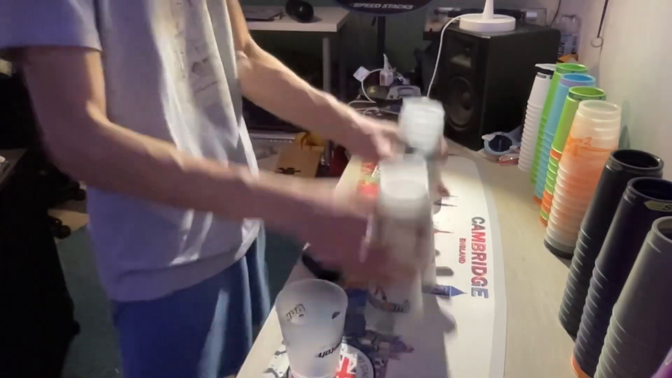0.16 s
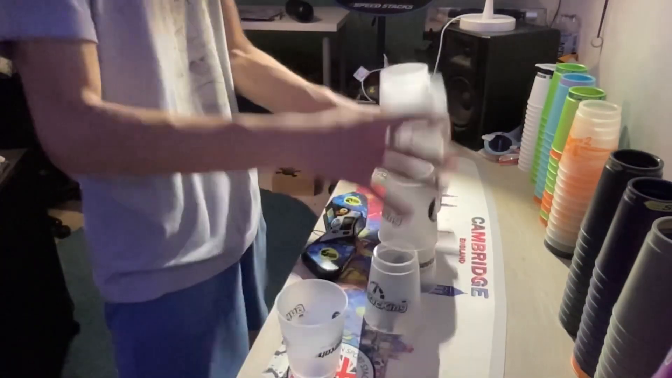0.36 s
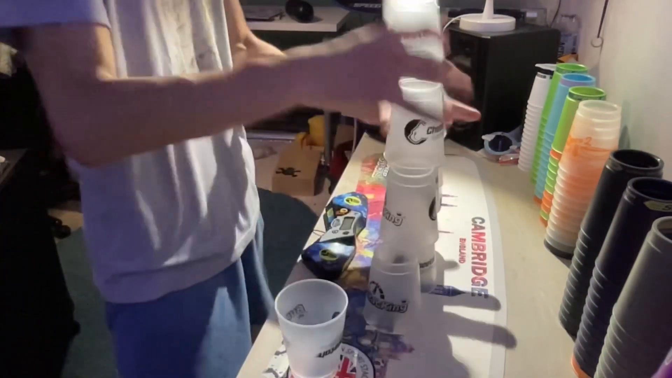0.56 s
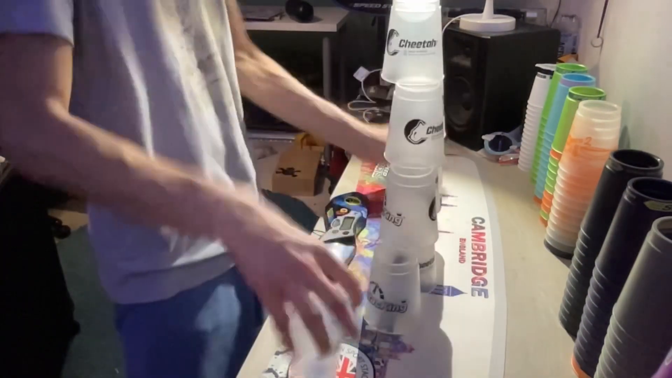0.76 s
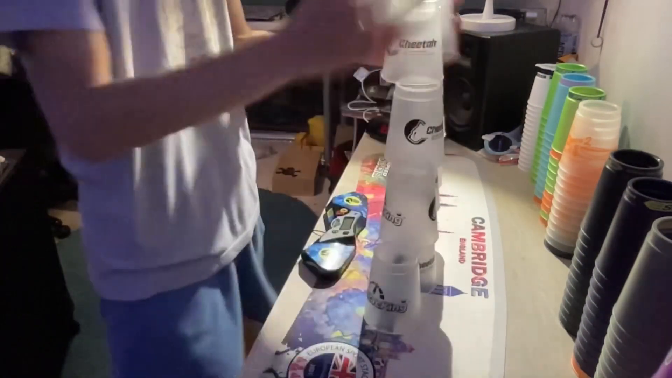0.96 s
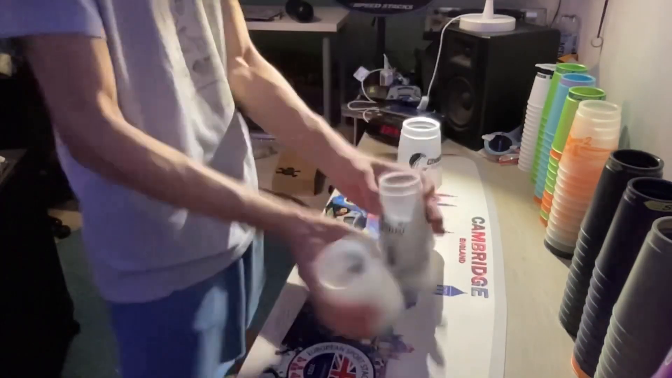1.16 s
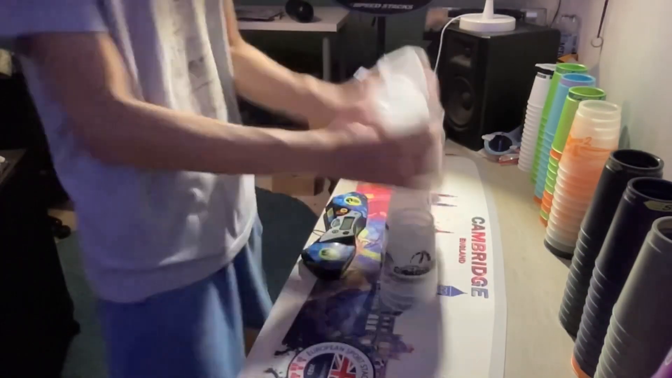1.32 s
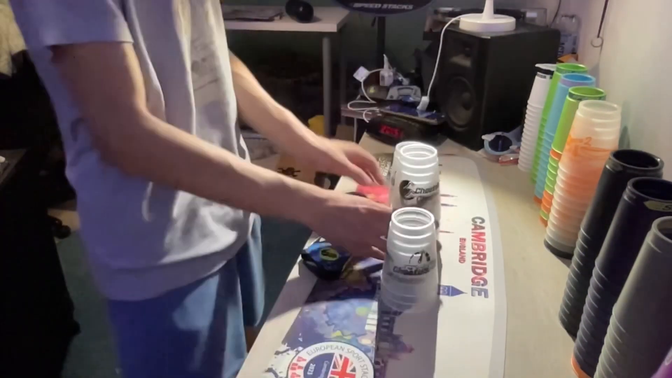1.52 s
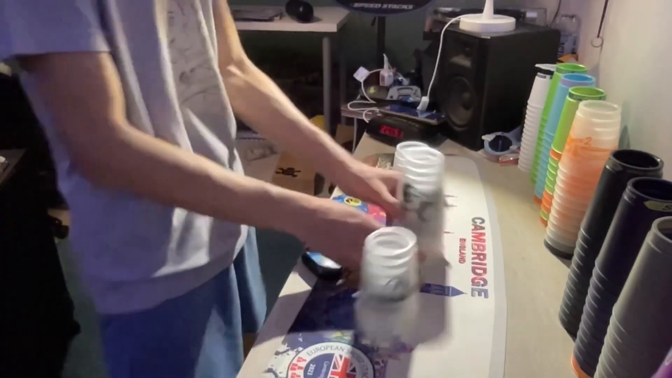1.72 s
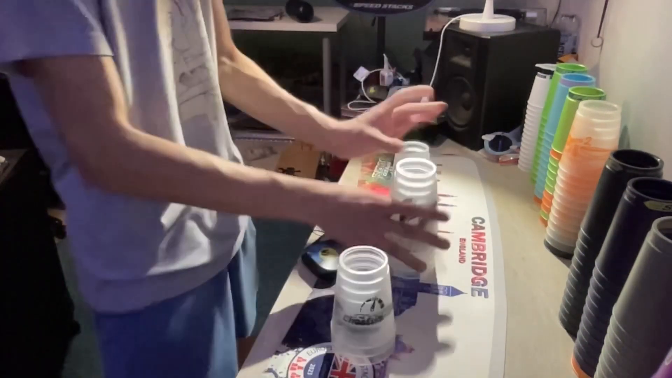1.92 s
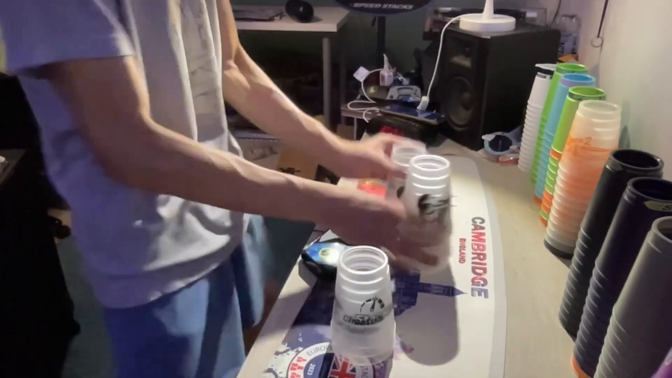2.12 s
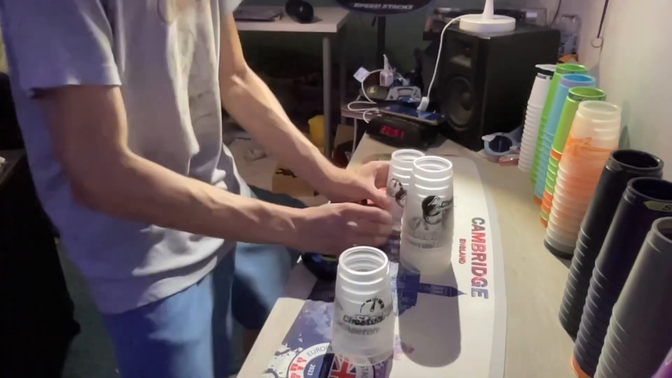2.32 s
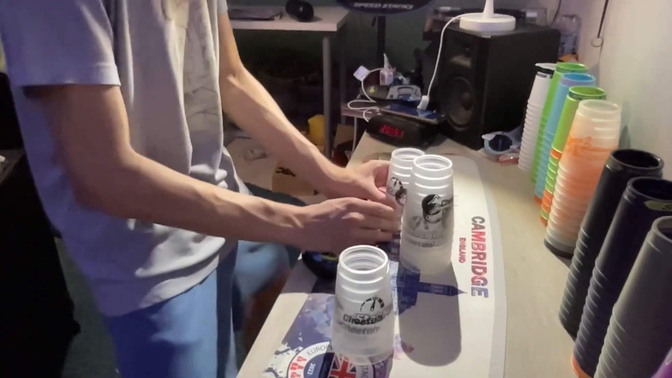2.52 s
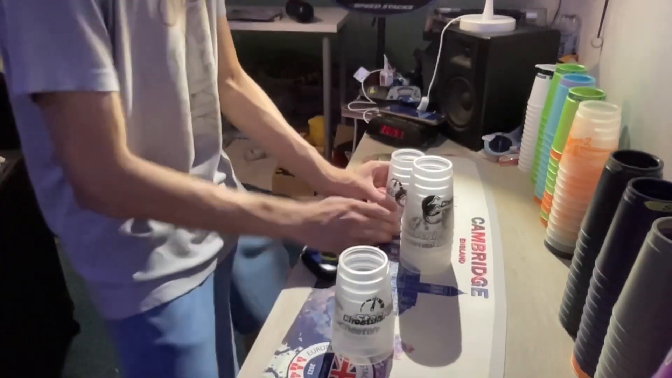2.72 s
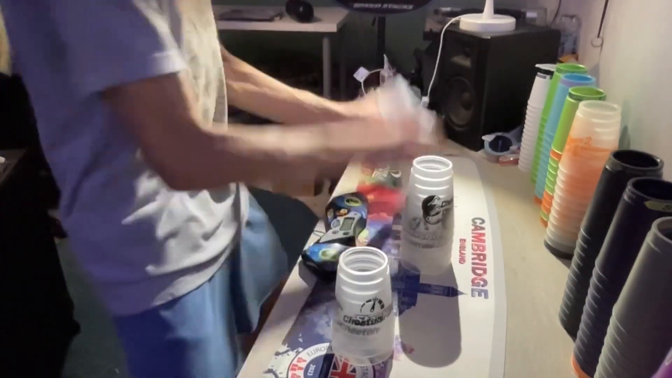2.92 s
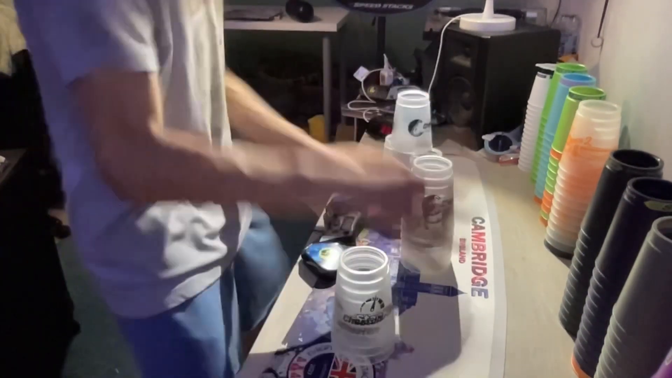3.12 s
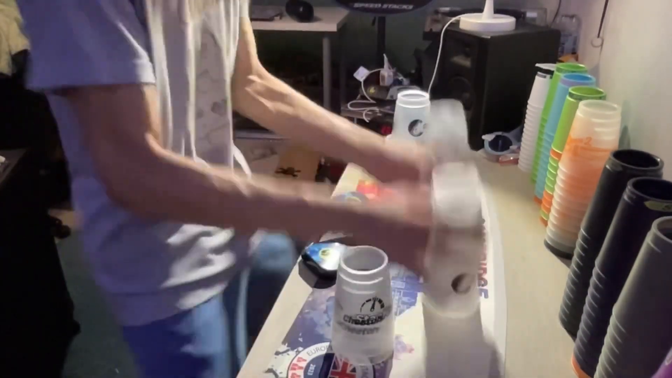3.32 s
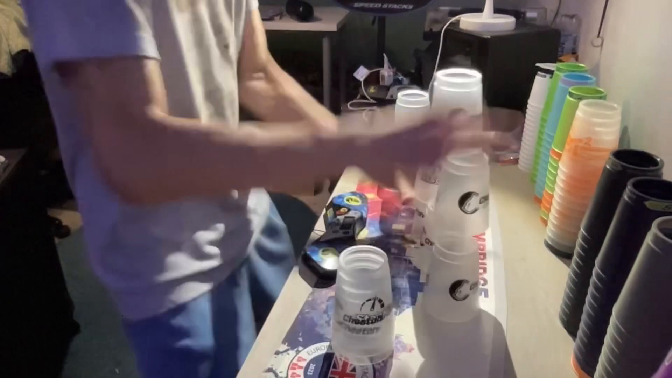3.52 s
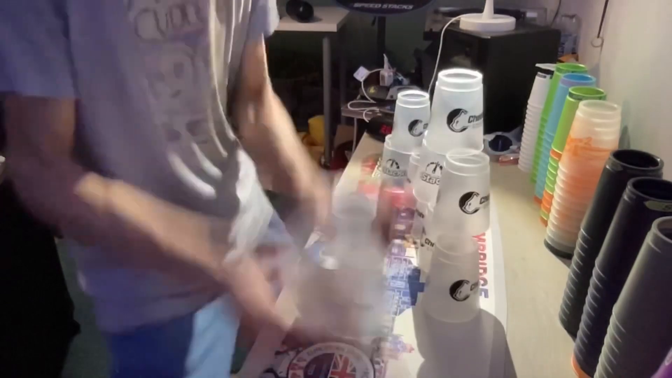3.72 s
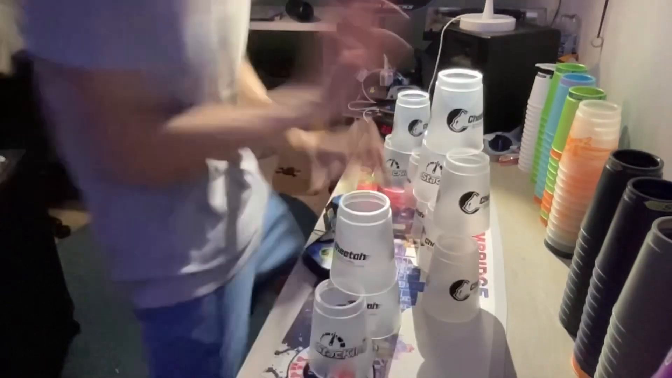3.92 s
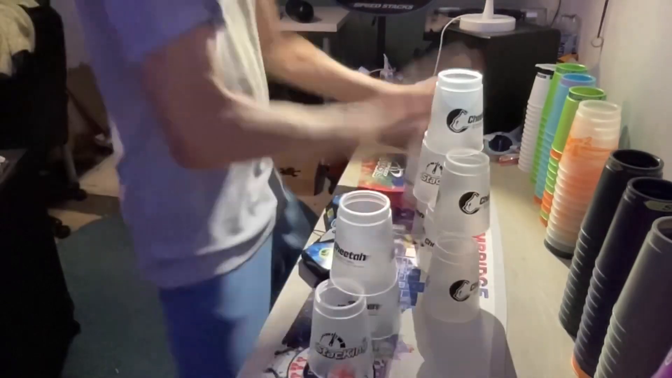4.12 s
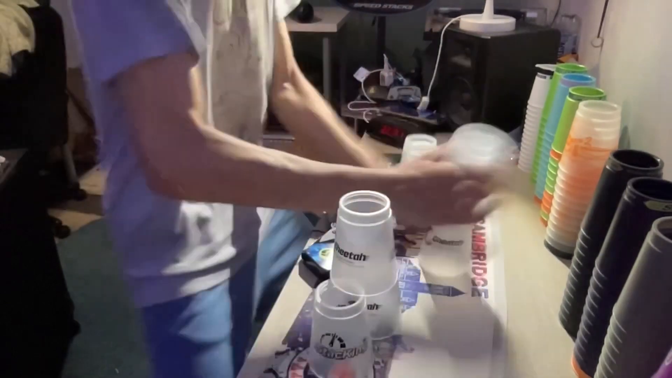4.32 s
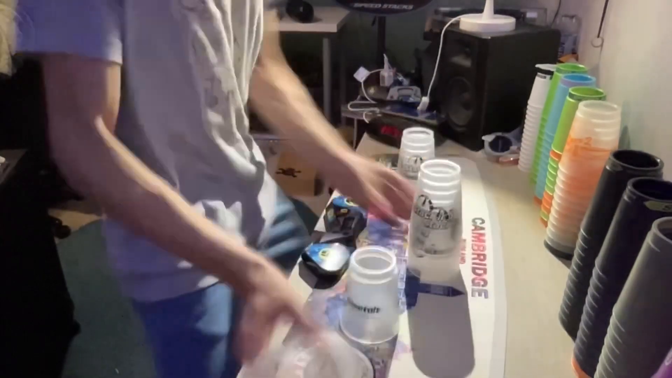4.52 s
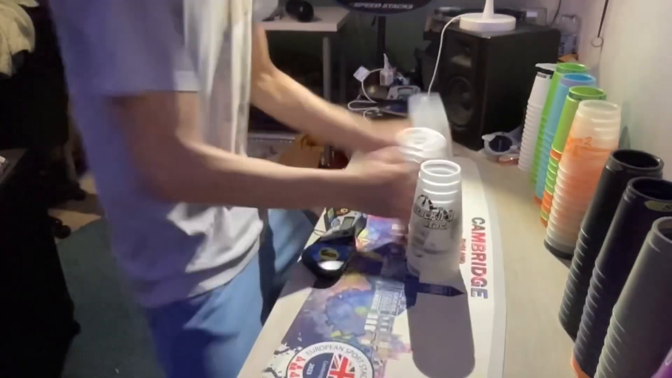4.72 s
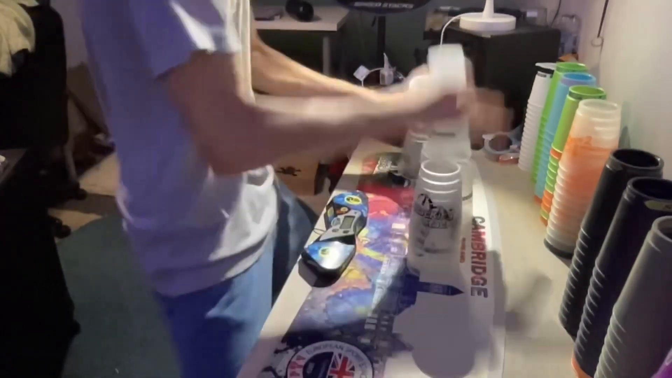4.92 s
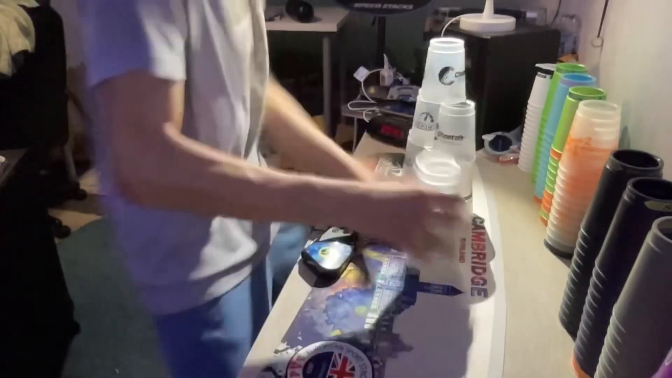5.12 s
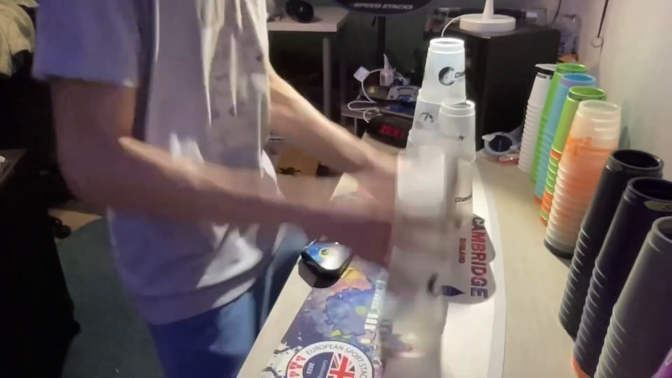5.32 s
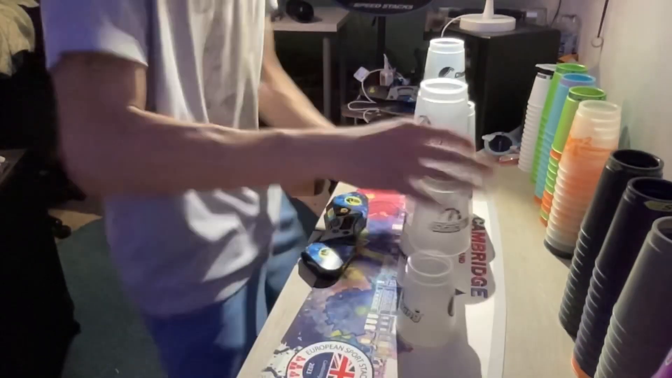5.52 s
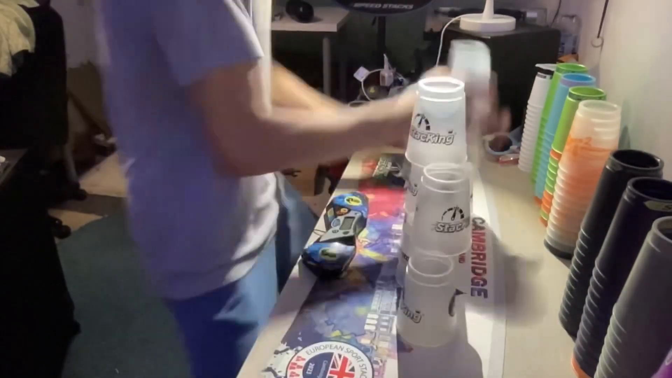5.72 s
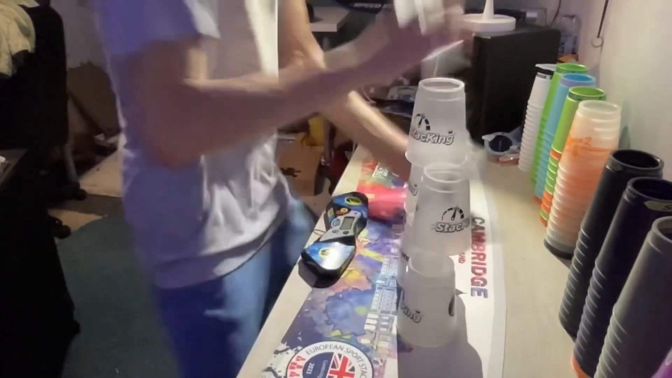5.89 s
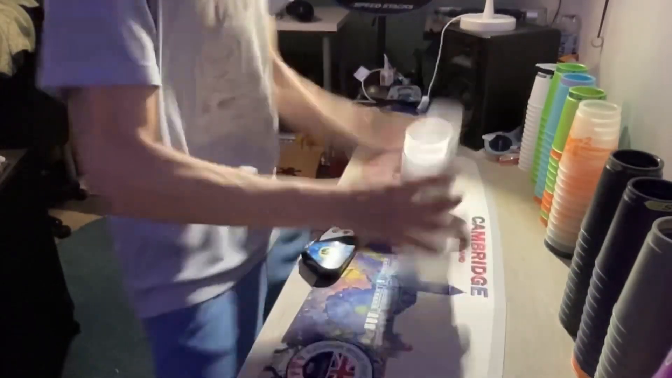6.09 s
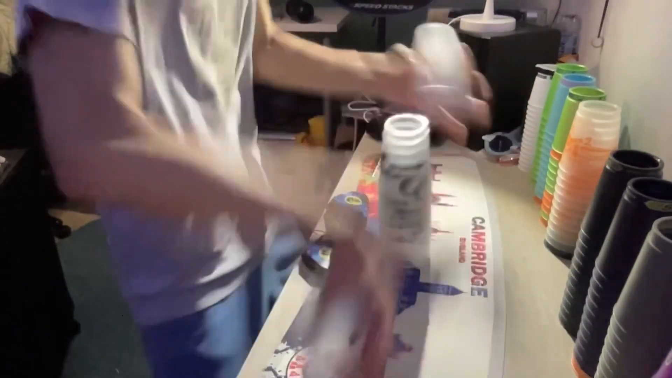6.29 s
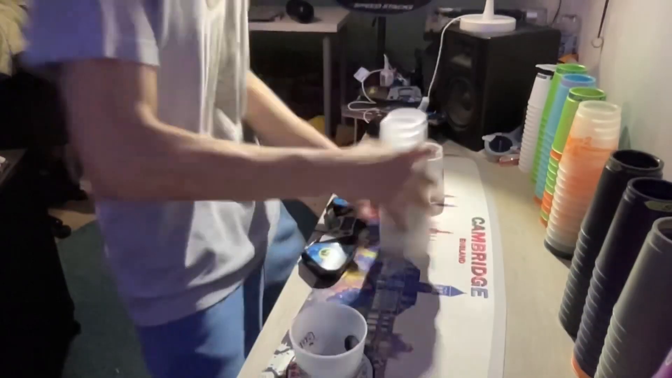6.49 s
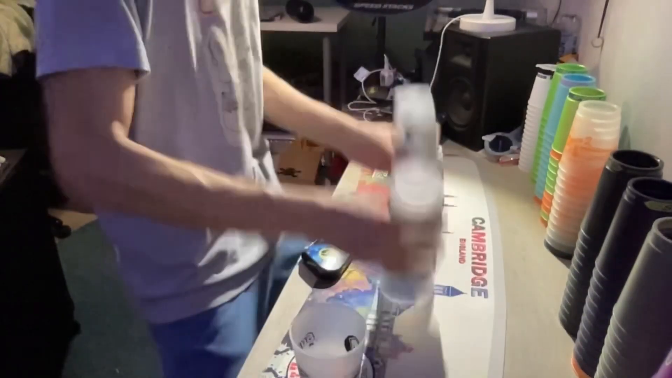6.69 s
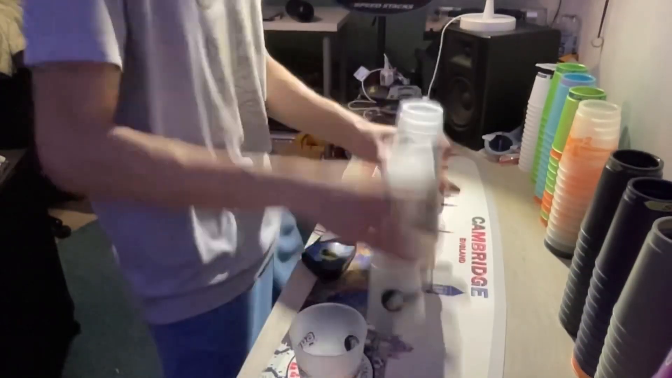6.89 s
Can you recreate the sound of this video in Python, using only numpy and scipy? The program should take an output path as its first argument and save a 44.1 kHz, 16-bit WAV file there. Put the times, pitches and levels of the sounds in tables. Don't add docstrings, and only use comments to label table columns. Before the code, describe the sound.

Rapid plastic cup stacking in a small damped room: hollow pops, rattling rim scrapes and overloading slams, a quiet gap, then another faster clatter.

```python
import sys
import numpy as np
from scipy import signal
from scipy.fft import rfft, irfft, next_fast_len
from scipy.io import wavfile
from scipy.ndimage import uniform_filter1d, map_coordinates

SR = 44100
rng = np.random.default_rng(int(sys.argv[2]) if len(sys.argv) > 2 else 0)


def ratio_of_db(decibels):
    return 10 ** (np.asarray(decibels, float) / 20)


def generate_wav(signal):
    frames = np.transpose(np.atleast_2d(signal))
    scaled = np.clip(frames, -1, 1) * 32767
    pcm = np.round(scaled).astype(np.int16)
    wavfile.write(sys.argv[1], SR, pcm)


N = 306495

# f/Hz, density/dB per Hz
RIM = [(1180, -4), (2000, -1.5), (2730, -6), (3180, -4.5), (6290, -5), (6800, -6.5), (7730, -7),
       (13400, -15.5), (15700, -20)]


def unit(x):
    return x / np.sqrt(np.mean(x ** 2) + 1e-20)


def along(points, hz):
    f, v = np.transpose(points)
    return np.interp(np.log(hz + 1), np.log(f + 1), v)


def filtered(x, response):
    m = next_fast_len(x.shape[-1] + 4096)
    spectrum = rfft(x, m) * response(np.fft.rfftfreq(m, 1 / SR))
    return irfft(spectrum, m)[..., :x.shape[-1]]


def shaped(x, points):
    return filtered(x, lambda f: ratio_of_db(along(points, f)))


def ring(modes, t, luck, rise):
    scatter_db, detune = 2.2, .02
    total = 0
    for (hz, db, t60), a, b in zip(modes, luck[::2], luck[1::2]):
        decay = ratio_of_db(db + scatter_db * a - 60 * t / t60)
        total = total + decay * np.sin(2 * np.pi * hz * (1 + detune * b) * t)
    return total * (1 - np.exp(-t / rise))


def tail(noise):
    # f/Hz, t60/s
    room_t60 = [(100, 0.35), (400, 0.14), (1100, 0.17), (3000, 0.17), (8000, 0.15), (15000, 0.18)]
    late_db, late_slower = -20.5, 2.12
    hz, t, z = signal.stft(noise, SR, nperseg=256)
    fall_db = -60 * t / along(room_t60, hz)[:, None]
    fall = ratio_of_db(fall_db) + ratio_of_db(late_db + fall_db / late_slower)
    x = signal.istft(z * fall, SR, nperseg=256)[1][:len(noise)]
    x = x * np.clip(np.arange(len(x)) / SR / 0.002 - .5, 0, 1)
    return x / np.linalg.norm(x)


def contacts(wet_db):
    # t/s, peak level/dB, cup air f/Hz, rim crack re peak/dB
    set_down = [(0.047, -6.5, 590, -24.5), (0.15, -7.5, 690, -22), (0.397, -18.5, 590, -21),
                (0.5, -10.5, 594, -20), (1.036, -36.5, 347, -13.5), (1.207, -22, 301, -5),
                (1.427, 6, 602, -15.5), (2.133, -17, 500, -15.5), (3.49, -5.5, 700, -24.5),
                (3.704, -24.5, 556, -7), (4.276, 3, 520.5, -4.5), (4.285, -7, 327, -10.5),
                (4.3, 3, 306, -9.5), (4.647, -10.5, 755, -11), (5.205, -18.5, 670, -11.5),
                (5.334, -16, 410, -24), (5.828, 3, 513, -9.5), (6.012, 1, 735, -5),
                (6.167, 2.5, 576, -19.5), (6.358, 2.5, 516, -24), (6.738, -5, 722, -21)]
    gripped = [(0.192, -25, 345, -30), (0.284, -27, 584, -15.5), (0.315, -17, 590, -22),
               (1.224, -10.5, 580, -13), (3.25, -18.5, 634, -15), (3.317, -21.5, 334, -50),
               (3.422, -8, 580, -20.5), (4.076, -7.5, 354, -25.5), (4.335, 0.5, 594, -27.5),
               (4.404, -4, 670, -17.5), (4.027, -6, 617, -26), (4.516, -0.5, 452, -15),
               (4.567, 0, 1000, -1.5), (4.813, -10, 535, -26), (4.885, -25.5, 350, -14),
               (5.174, -12, 474, -28.5), (5.365, -26, 353, -7.5), (5.929, -9, 634, -17.5),
               (5.97, -19, 584, -1), (6.085, 0.5, 560, -12), (6.142, -2.5, 640, -21)]
    nested = [(0.336, -6, 634, -25), (0.349, -17, 600, -21), (0.468, -11, 510, -24.5),
              (0.603, -7.5, 594, -19), (1.135, -12, 615, -7), (1.376, -27.5, 564, -12.5),
              (1.395, -10, 560, -9.5), (3.05, -12, 509, -16.5), (3.062, -1.5, 690, -17.5),
              (3.367, -3.5, 440, -25.5), (4.146, -7, 530, -9.5), (4.196, -10, 540, -9.5),
              (4.418, 4.5, 390, -14.5), (4.56, -14, 398, 3.5), (4.668, 1, 540, -20.5),
              (4.903, -7, 394, -20.5), (4.999, -11, 594, -16.5), (5.025, -7.5, 626, -17.5),
              (5.04, -2.5, 647, -21.5), (5.735, -13, 590, -17.5), (5.91, 4.5, 642, -17.5),
              (6.078, 4, 457, -12), (6.562, -9, 554, -20.5), (6.887, -4, 412, -23.5),
              (6.941, -5.5, 620.5, -24)]
    held = [(1.854, -46.5, 645, -30), (0.215, -5, 610, -23.5), (0.26, -49, 554, -35),
            (0.438, -0.5, 623, -24), (0.626, -10.5, 532, -17.5), (3.055, 3, 676, -21),
            (3.524, -4.5, 692, -23), (3.562, 1, 640, -20), (3.837, 0.5, 782, -15), (4.115, -23, 480, -8),
            (4.238, -5, 331, -21), (4.96, -13, 660, -22), (5.409, -7, 354, -26), (5.473, -8, 803, -20),
            (6.795, -3.5, 585, -22.5)]
    knocked = [(0.612, -8.5, 468, -12.5), (1.056, -17.5, 534, -16), (1.105, -20, 550, -9),
               (1.158, -17.5, 514, -3), (1.167, -11, 610, -11.5), (1.175, -10.5, 755, -8),
               (3.548, -19, 553, -3.5), (3.809, 2.5, 378, -25), (3.821, -6.5, 308, -22.5),
               (4.383, -7, 496, -2.5), (4.551, -16, 503, 4), (5.547, -6, 697, -14), (5.811, -7.5, 527, -1),
               (6.025, 5, 316.5, -16), (6.402, 5.5, 640, -27)]
    slammed = [(1.189, -0.5, 316, -11), (1.434, 0.5, 345, -13.5), (1.442, -10.5, 706, -10.5),
               (1.75, -39, 300, -33), (2.234, -35, 409, -11), (2.243, -6.5, 560, -6),
               (2.895, -26, 314, -20), (3.205, -18, 440, -17), (3.573, -16, 756, -11),
               (3.686, -30, 360, -8.5), (4.258, -5, 390, 1), (4.691, -10, 610, -6.5),
               (5.439, -26, 464, -5.5), (5.508, -13, 580, -10), (5.557, -17.5, 680, -16),
               (5.772, -34, 470, 5), (5.99, -7, 456, 0), (6.044, -8, 724, -12), (6.209, -39, 616, -21),
               (6.516, -24.5, 563, -12.5)]
    thuds = [(0.8, -27, 597, -21.5), (0.815, -26.5, 590, -18), (1.196, -7.5, 415, -3.5),
             (1.995, -32, 580, -22), (3.012, -34.5, 497, -22), (3.182, -24.5, 324, -18),
             (3.671, -27, 301, -27), (3.792, -19.5, 445, -30), (4.494, -12.5, 400, -21.5),
             (4.803, -34, 544, -3.5), (5.164, -31, 333, -20.5), (6.027, 0, 330, -11),
             (6.11, -1.5, 324, -21), (6.276, -7, 313, -6.5)]
    # contacts, table thump re peak/dB, wall ring re peak/dB
    kinds = [(set_down, -8.5, -3.5), (gripped, -6, -12), (nested, -20.5, -4), (held, -18.5, -8),
             (knocked, -17, 6.6), (slammed, 0.047, 2.4), (thuds, 0.78, -19.5)]
    # f/Hz, level/dB, t60/s
    wall_modes = [(1112, 2, 0.0084), (1279, -5, 0.011), (1434, -5.5, 0.012), (1620, -2, 0.0088),
                  (1860, -10, 0.014), (2083, -8.5, 0.0015), (2858, -5, 0.0069)]
    # f/Hz, level/dB, t60/s
    table_modes = [(144.6, -8.5, 0.13), (221.8, -14, 0.095), (256.2, -5, 0.079), (339, 2.5, 0.031)]
    # f/Hz, level/dB, t60/s
    frame_modes = [(60.4, -29.5, 0.63)]

    size = SR // 2
    hits = sorted((s, db, hz, thump_db, wall_db, rim_db)
                  for rows, thump_db, wall_db in kinds for s, db, hz, rim_db in rows)
    out, t = np.zeros(N + 2 * size), np.arange(size) / SR
    luck = rng.standard_normal((len(hits), 36))
    cracks = unit(shaped(rng.standard_normal((len(hits), size)), RIM))
    tails = rng.standard_normal((len(hits), size))
    for (s, db, hz, thump_db, wall_db, rim_db), u, crack, noise in zip(hits, luck, cracks, tails):
        air_modes = [(hz, 0, .014), (.95 * hz, -17, .07), (1.417 * hz, -7, .012)]
        air = ring(air_modes, t, 0.88 * u, rise=0.00078)
        push = ring([(0.81 * hz, -0.5, .004)], t, u[6:], rise=0.0012)
        pop = ratio_of_db(-2.0) * air + ratio_of_db(7.0) * push
        pop = signal.lfilter([1, -1], [1, -.97], pop)

        wall = ratio_of_db(wall_db - 3) * ring(wall_modes, t, u[6:], rise=0.0016)

        soft = np.clip(.35 - 0.0053 * (db + rim_db + 8.5), .02, .8)
        crack = signal.lfilter([1 - soft], [1, -soft], crack)
        rocking = np.sin(2 * np.pi * 110 * ratio_of_db(2 * u[34]) * t + u[35])
        chatter = ratio_of_db(-60 * t / .06) * (1 + .7 * rocking)
        envelope = (ratio_of_db(-60 * t / 0.0058) + 0.38 * chatter) * (1 - np.exp(-t / 0.00098))
        rim = ratio_of_db(rim_db + 4) * crack * envelope

        thump = ratio_of_db(thump_db + 4) * ring(table_modes, t, u[20:], rise=0.0055)
        frame_db = thump_db + .5 * min(db + thump_db + 10, 0)
        thump += ratio_of_db(frame_db) * ring(frame_modes, t, u[30:], rise=.015)

        cup = pop + wall + rim
        answer = signal.fftconvolve(cup[:size // 4] + 0.21 * thump[:size // 4], tail(noise))[:size]
        out[round(s * SR):][:size] += ratio_of_db(db) * (cup + thump + ratio_of_db(wet_db) * answer)
    return out[:N]


def clacks(wet_db):
    # t/s, peak level/dB, f/Hz, t60/s
    side_blows = [(0.151, -30, 1580, .04), (0.218, -24, 1850, .04), (0.4363, -23, 1950, 0.049),
                  (0.439, -20, 990, .06), (0.6117, -5, 1438, .06), (.613, -12.5, 1123, 0.051),
                  (.222, -25.5, 1080, .08), (.05, -25, 1180, 0.047), (1.0536, -21.5, 1290, 0.069),
                  (1.108, -11, 3220, 0.025), (1.1183, -11.5, 1346, 0.033), (1.1667, -10, 1973, .03),
                  (1.188, -0.5, 1570, 0.013), (1.427, -2, 2080, 0.016), (1.748, -37, 1350, .012),
                  (1.855, -52, 1300, .012), (2.243, -12.5, 2000, .03), (2.81, -45, 1700, .15),
                  (4.259, -3.5, 1500, 0.014), (5.031, -13, 2810, 0.013), (2.008, -48, 1500, 0.022),
                  (3.5657, -9.5, 1320, 0.058), (3.7, -28, 1550, .04), (3.809, -2.5, 998, 0.049),
                  (3.84, -10, 1280, .04), (4.029, -22, 1185, 0.037), (4.151, -14, 1840, .02),
                  (4.194, -16.5, 1390, 0.036), (4.542, -13, 1380, 0.022), (4.5513, -6, 1410, 0.07),
                  (4.5623, 5, 1730, 0.02), (4.5683, 4, 1950, 0.015), (4.593, -22, 2130, 0.033),
                  (4.6909, -10, 1620, 0.025), (5.03, -17, 1634, .04), (5.474, -19, 1400, .02),
                  (5.508, -18, 1350, 0.072), (5.55, -6, 1384, 0.047), (5.7496, -18.5, 1305, .07),
                  (5.811, -10, 1470, 0.018), (5.8323, -11, 1400, .03), (5.9912, -0.5, 1390, 0.032),
                  (6.0247, 3, 1600, .02), (6.0777, 3, 1580, 0.013), (6.168, -4.5, 1450, 0.018),
                  (6.361, -7, 957, 0.053), (6.401, -3, 2480, 0.017), (6.41, -11, 2100, .04),
                  (6.565, -28, 1020, 0.046), (6.602, -32, 1620, 0.022)]
    out, t = np.zeros(N + SR), np.arange(SR // 4) / SR
    luck = rng.standard_normal((len(side_blows), 4))
    tails = rng.standard_normal((len(side_blows), SR // 2))
    for (s, db, hz, t60), u, noise in zip(side_blows, luck, tails):
        wall = ring([(hz, -4, t60), (1.07 * hz, -10, t60)], t, 0.25 * u, rise=0.00057)
        answer = signal.fftconvolve(wall, tail(noise))[:len(t)]
        out[round(s * SR):][:len(t)] += ratio_of_db(db) * (wall + ratio_of_db(wet_db) * answer)
    return out[:N]


def snaps(t60, wet_db):
    # t/s, peak level/dB
    rim_snaps = [(1.0326, -30.5), (1.0541, -12.5), (1.1079, -11.5), (1.1403, -15), (1.1481, -5),
                 (1.1583, -1.5), (1.1669, -5.5), (1.1764, -5.5), (1.1984, -13), (1.2054, -12),
                 (1.3681, -26), (1.3748, -21), (1.3942, -14.5), (1.4272, -6.5), (1.4347, -6),
                 (1.9646, -63.5), (1.9814, -64), (2.0061, -47.5), (2.0975, -60.5), (4.2422, -13.5),
                 (4.258, 1), (4.2737, 3.5), (4.2997, -1.5), (4.3826, -4), (4.424, -9), (4.5149, -10.5),
                 (4.5518, -1.5), (4.5703, -0.5), (4.5693, 1), (4.6463, -14.5), (5.97, -8), (5.9902, -9),
                 (5.9941, -2.5), (6.009, -7), (6.0294, -6), (6.0454, -7), (6.0771, -6), (6.0852, -5),
                 (6.1104, -9.5), (6.1664, -11), (6.2086, -16.5)]
    out, t = np.zeros(N + SR), np.arange(SR // 4) / SR
    noise = rng.standard_normal((len(rim_snaps), 2, SR // 2))
    for (s, db), (crack, room) in zip(rim_snaps, noise):
        envelope = ratio_of_db(-60 * t / t60) * (1 - np.exp(-t / 0.00056))
        snap = unit(shaped(crack[:len(t)], RIM)) * envelope
        answer = signal.fftconvolve(snap, tail(room))[:len(t)]
        out[round(s * SR):][:len(t)] += ratio_of_db(db - 5.5) * (snap + ratio_of_db(wet_db) * answer)
    return out[:N]


def sliding():
    # t/s, effort level/dB
    effort = [(0.0, -55.5), (0.55, -60), (0.75, -90), (1.05, -100), (1.22, -52), (1.36, -60), (1.55, -77),
              (2.2, -80), (2.3, -70), (2.6, -85), (2.96, -79), (3.39, -60), (3.77, -66), (4.1, -51.5),
              (4.7, -55.5), (5.3, -67), (5.81, -56), (6.95, -62.5)]
    # t/s, length/s, start hiss/dB, end hiss/dB, rattle re hiss/dB
    stroke_rows = [(0.0, 0.031, -51, -59, 20), (.07, .24, -62, -62, 18), (.36, .23, -60, -64, 18),
                   (4.73, .17, -58, -60, 14), (5.145, .18, -58, -66, 16), (1.031, 0.033, -38, -45, 6),
                   (1.056, 0.11, -33, -31.5, 1), (1.371, 0.055, -35, -28, 2.5),
                   (1.549, 0.097, -58, -84, 11.5), (1.725, 0.1, -76, -80, 14),
                   (2.758, 0.05, -75.5, -56, -9.5), (2.812, 0.066, -49, -55, -9.5),
                   (2.903, 0.058, -71, -85, 23), (3.689, 0.015, -57.5, -43, 5), (3.708, 0.03, -44, -56, 9),
                   (4.115, .035, -41.5, -45.5, 2), (4.133, 0.077, -38.5, -40, 5),
                   (4.226, 0.063, -48.5, -29, 18), (4.298, 0.25, -36.5, -40.5, 7),
                   (4.526, 0.016, -34.5, -34.5, 6), (4.545, 0.027, -29.5, -28, -5),
                   (4.563, 0.056, -27, -52, -8), (5.724, .075, -49, -33, 12),
                   (5.853, 0.088, -49.5, -35.5, 3), (5.919, 0.18, -47.5, -52.5, 12),
                   (5.968, 0.06, -28, -23, 4), (6.188, 0.028, -41, -31.5, -6.5),
                   (6.218, 0.045, -37.5, -47.5, -0.5)]
    # f/Hz, bandwidth/Hz, level/dB
    body_modes = [(155, 18, 10.5), (345, 270, 7), (670, 100, 10), (1350, 120, -5.5), (1950, 140, -23)]
    hand_rattle_db, shift_db = 0.5, 2.5

    clock = np.arange(N) / SR
    shifting = map_coordinates(rng.standard_normal(99), [12 * clock])
    hands = 0.83 * ratio_of_db(np.interp(clock, *np.transpose(effort)) + shift_db * shifting)
    hiss_gain, rattle_gain = hands, ratio_of_db(hand_rattle_db) * hands
    for s, length, from_db, to_db, over_db in stroke_rows:
        stroke = ratio_of_db(np.interp(clock, [s, s + length], [from_db, to_db], left=-150, right=-150))
        hiss_gain = hiss_gain + stroke
        rattle_gain = rattle_gain + ratio_of_db(over_db) * stroke
    fade = np.exp(-1 / (.008 * SR))
    hiss_gain, rattle_gain = signal.lfilter([1 - fade], [1, -fade], [hiss_gain, rattle_gain])

    grip = hiss_gain / (hiss_gain + ratio_of_db(-42))
    ribs = ratio_of_db(3.5 * grip * unit(uniform_filter1d(rng.standard_normal(N), size=120)))
    grains = unit((rng.random(N) < .02) * rng.standard_normal(N))
    slips = grains * grip + .7 * rng.standard_normal(N)

    def body(f):
        total = 0
        for k, (centre, wide, db) in enumerate(body_modes):
            band = 1j * f * wide
            total = total + (-1) ** k * ratio_of_db(db) * band / (centre * centre - f * f + band)
        return total

    rattle = unit(filtered(slips * ribs, body))
    hiss = unit(shaped(rng.standard_normal(N), RIM))
    dull = filtered(hiss, lambda f: 1 / (1 + 1j * f / 7000))
    hiss = grip * hiss + (1 - grip) * 1.29 * dull
    catches = (rng.random(N) < 60 / SR) * rng.exponential(size=N)
    nicks = signal.lfilter([1], [1, -.985], catches)
    hiss = hiss * (1.1 + .8 * np.sqrt(grip) * nicks)
    return hiss_gain * hiss * ribs + rattle_gain * rattle


def hums():
    # t/s, length/s, peak level/dB, f/Hz
    swell_tones = [(5.012, 0.059, -8.5, 620), (3.052, 0.021, -13.5, 780), (0.614, 0.022, -13, 560),
                   (1.06, 0.038, -18, 450), (0.514, 0.074, -33.5, 590), (0.255, 0.025, -33, 530),
                   (1.3, 0.055, -38, 140), (3.1, 0.017, -32, 140), (6.565, 0.057, -35, 530),
                   (6.278, 0.031, -10, 152), (6.515, 0.039, -30, 138), (5.6, 0.059, -43, 210),
                   (4.535, 0.0085, -9.5, 440), (4.2865, 0.0066, 3, 250), (4.3012, .007, 3, 240),
                   (6.0265, .008, 5, 230), (6.1105, 0.0058, -1, 253), (6.1675, .004, -0.5, 414),
                   (5.09, .05, -34, 630), (1.06, .04, -27.5, 1330), (2.02, 0.078, -54, 620),
                   (2.84, 0.054, -44, 155), (2.36, 0.11, -62, 680), (2.78, .12, -50, 1750),
                   (3.96, .08, -48, 1700), (.67, .1, -46, 1480), (4.17, .05, -24, 1400),
                   (4.553, .03, -8, 1900)]
    waver_per_db = .002
    out = np.zeros(N)
    for (s, length, db, hz), noise in zip(swell_tones, rng.standard_normal((len(swell_tones), SR // 4))):
        t = np.arange(round(length * SR)) / SR
        drift = np.cumsum(noise[:len(t)]) * np.sqrt(2 * np.pi * waver_per_db * max(-db, 0) * hz / SR)
        swell = np.sin(np.pi * t / length) ** 2
        out[round(s * SR):][:len(t)] += ratio_of_db(db) * swell * np.sin(2 * np.pi * hz * t + drift)
    return out


def sleeves():
    # t/s, length/s, level/dB
    arm_moves = [(1.641, .3, -66), (1.95, .2, -67), (2.76, 0.2, -69), (0.96, 0.11, -62.5), (2.3, 0.27, -71),
                 (3.692, .06, -52), (3.96, .1, -53.5), (4.82, .05, -55), (5.159, .1, -51.5),
                 (5.36, .1, -53), (5.66, .08, -55), (6.501, 0.13, -58), (6.62, 0.11, -62)]
    # f/Hz, density/dB per Hz
    cloth = [(1500, -30), (3000, -9), (6500, 0.5), (8500, -2.5), (11000, -14), (15000, -29.5)]
    clock = np.arange(N) / SR
    swell = sum(ratio_of_db(db) * np.sin(np.pi * np.clip((clock - s) / length, 0, 1))
                for s, length, db in arm_moves)
    folds = ratio_of_db(2.5 * map_coordinates(rng.standard_normal(299), [40 * clock]))
    return swell * folds * unit(shaped(rng.standard_normal(N), cloth))


def ticks():
    # t/s, peak level/dB
    tick_rows = [
        (1.6534, -41),
        (2.4943, -41.5),
        (2.623, -39),
        (2.7396, -40),
        (2.9731, -38.5),
    ]
    # f/Hz, density/dB per Hz
    tick_colour = [(1200, -40), (2000, 0), (5000, -3), (9500, -8.5), (11000, -33)]
    out, t = np.zeros(N), np.arange(300) / SR
    for (s, db), noise in zip(tick_rows, rng.standard_normal((len(tick_rows), len(t)))):
        out[round(s * SR):][:len(t)] += ratio_of_db(db - 60 * t / 0.0095) * noise
    return shaped(out, tick_colour)


def hush():
    # f/Hz, density/dB per Hz
    quiet = [(18, -20), (30, -13.5), (147, 0.5), (312, -13.5), (448, -14), (881, -20.5), (1650, -23),
             (3500, -33), (15000, -38.5)]
    return ratio_of_db(-69) * unit(shaped(rng.standard_normal(N), quiet))


def scene():
    cups = contacts(wet_db=-1.5) + clacks(wet_db=-7.0) + snaps(t60=0.016, wet_db=-7) + sliding()
    return (cups + hums() + sleeves() + ticks() + hush())[None]


def band_limit(x):
    return signal.sosfilt(signal.butter(12, 15820, fs=SR, output="sos"), x)


def record(dry):
    heard = filtered(dry, lambda f: (1j * f / (60 + 1j * f)) ** 2 * (f < 15820))
    return band_limit(np.clip(heard, -1, 1))


dry = scene()
out = record(dry)
generate_wav(out)
```